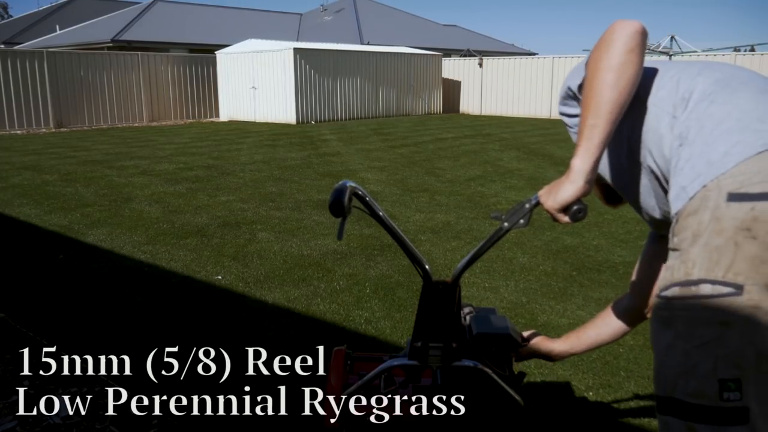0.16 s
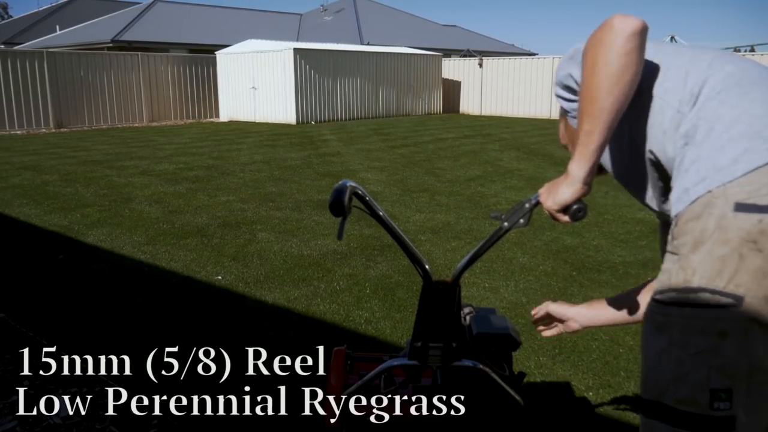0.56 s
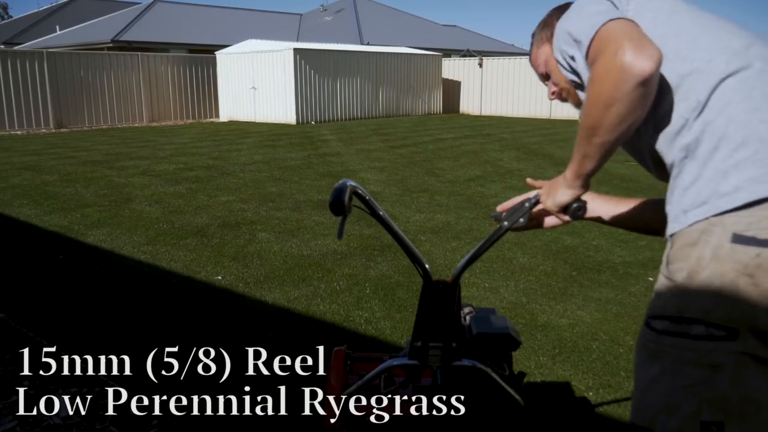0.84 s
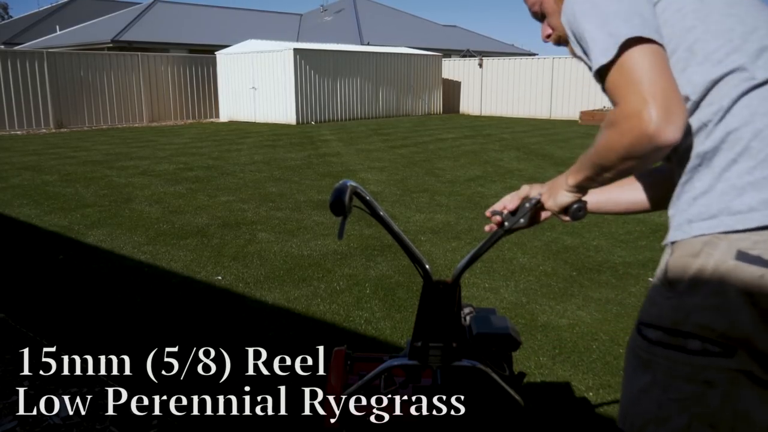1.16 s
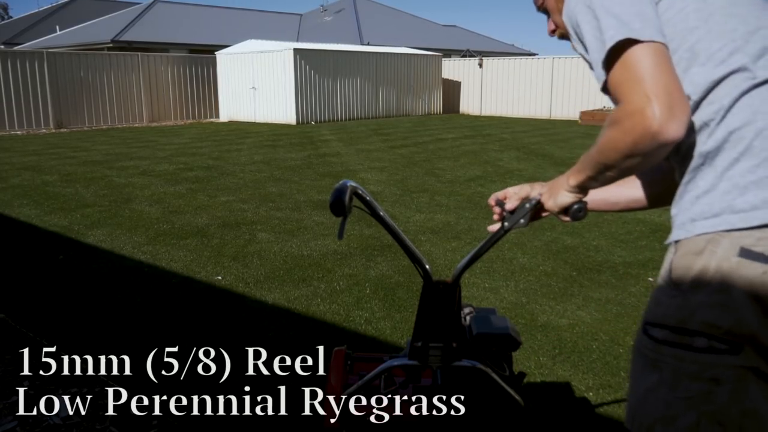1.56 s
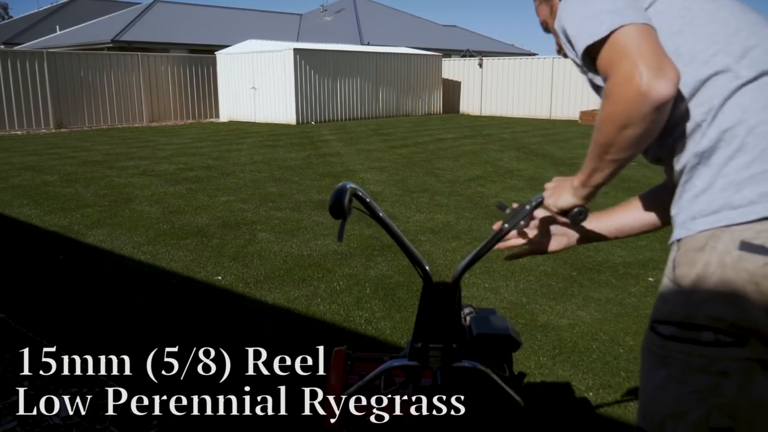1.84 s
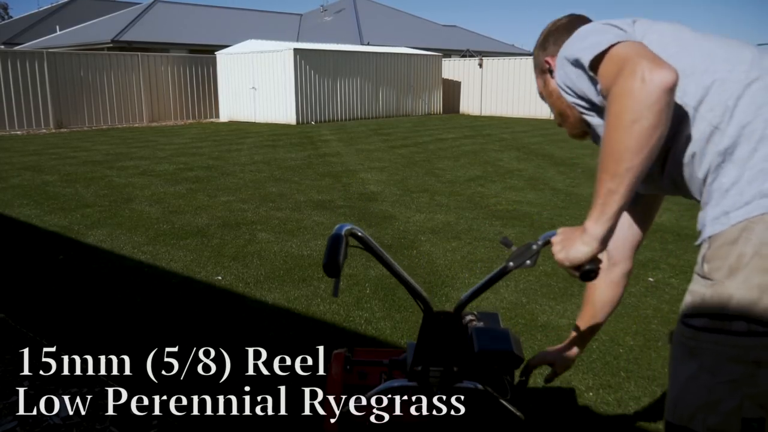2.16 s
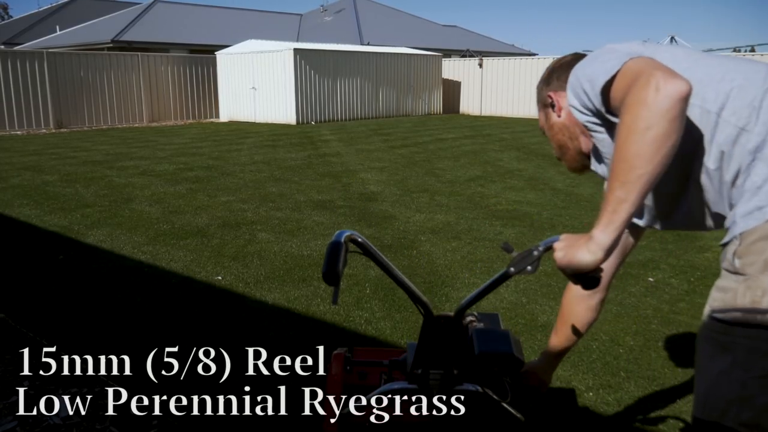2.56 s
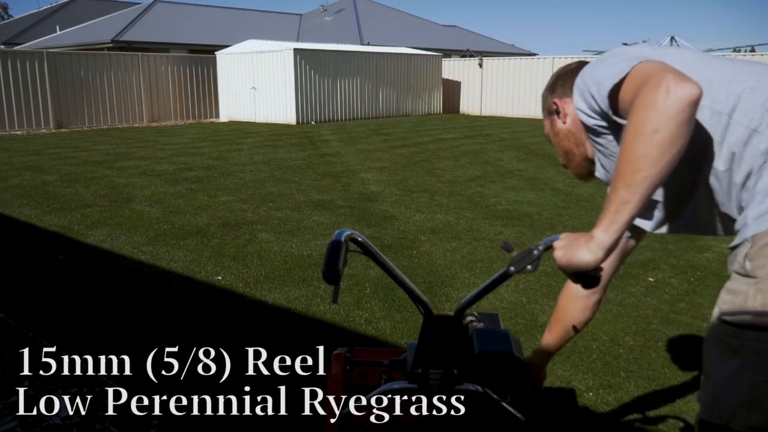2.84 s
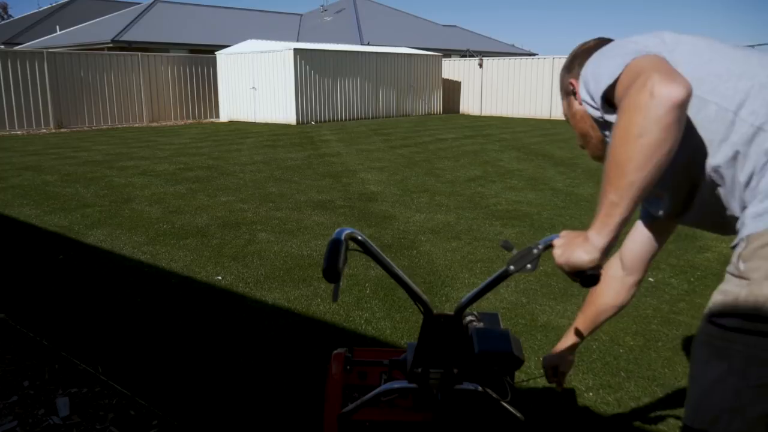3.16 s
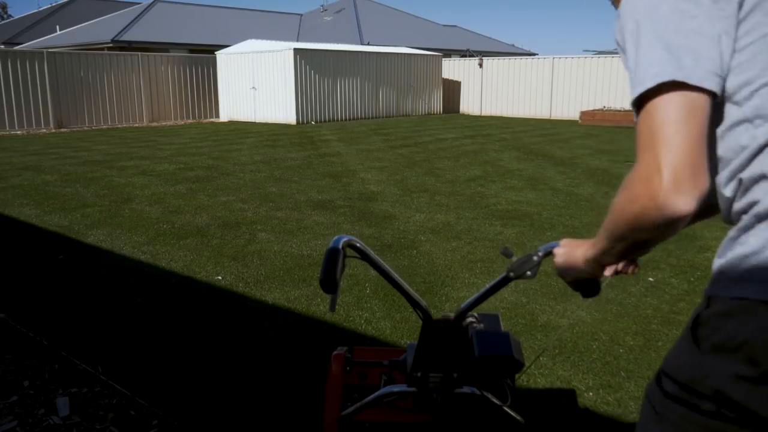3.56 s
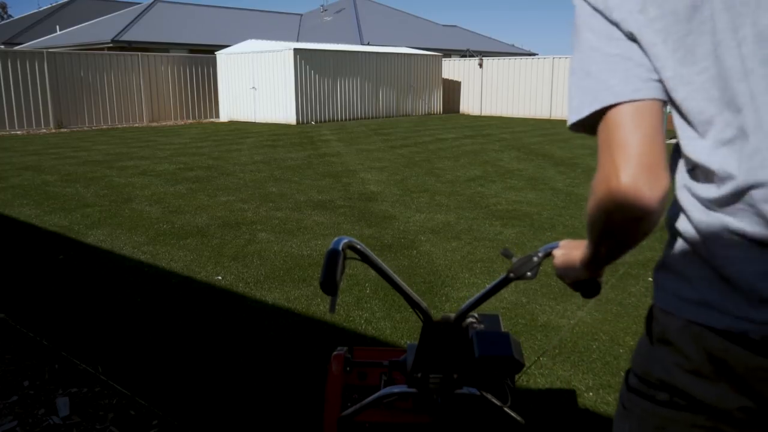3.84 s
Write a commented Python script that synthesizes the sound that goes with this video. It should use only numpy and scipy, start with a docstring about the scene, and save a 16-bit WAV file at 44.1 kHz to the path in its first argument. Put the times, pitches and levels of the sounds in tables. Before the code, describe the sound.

Mower levers click sharply in a windy garden, then the pull starter rattles and clanks

```python
"""Wind buffets the microphone over a quiet garden; levers click, then a mower's starter is pulled.
Wind, hush and hiss are noise shaped in bands; the cable scrape is gritty noise ringing its sheath.
Clicks and knocks are bursts of noise that ring the metal; dense pawl ticks make the starter's rattle.
Squeaks and a whirr are thin wandering bands of noise. The turning engine rumbles and gives four
low puffs, the last one strongest. Fences and a shed send back dull echoes of the mower's metal."""
import sys
import numpy as np
from scipy import signal
from scipy.io import wavfile

SR = 44100
rng = np.random.default_rng(int(sys.argv[2]) if len(sys.argv) > 2 else 0)


def int16_out(signal):
    """Quantize to a 16-bit WAV file."""
    q = np.round(np.clip(np.atleast_2d(signal).T, -1, 1) * 32767)
    wavfile.write(sys.argv[1], SR, q.astype(np.int16))


N = 176400  # length in samples: 4 seconds

# Levels in these tables are in dB, before the small overall trims made in the functions.
# Tone of the suburban hush. Each row: frequency in Hz, relative strength in dB per Hz.
HUSH_TONE = [(150, -5), (553, -17.5), (586, -1), (671, -16), (953, -17), (1410, -20.5), (2120, -27.5),
             (7000, -41.5), (8500, -39), (10500, -43), (13500, -50), (15700, -65)]
# Loudness of the hush. Each row: time in seconds, level in dB.
HUSH_LEVEL = [(0.0, -59), (1.59, -60.5), (2.87, -60.5), (3.5, -59.5)]
# Wind on the microphone. Each row: time in seconds, level in dB.
GUST_LEVEL = [(.03, -27), (.09, -35.5), (.21, -50.5), (.38, -43.5), (.64, -41.5), (.86, -31), (1.04, -33),
              (1.28, -29.5), (1.35, -34.5), (1.59, -27), (1.71, -34), (1.89, -31), (2.03, -34), (2.11, -39),
              (2.29, -30.5), (2.68, -39), (2.81, -46), (3.14, -35), (3.35, -47), (3.52, -54), (3.9, -46)]
# Tone of the wind. Each row: frequency in Hz, relative strength in dB per Hz.
WIND_TONE = [(13, -12), (24, 1), (58, -2), (158, -21), (296, -40), (500, -38.5), (650, -41.5), (1100, -120)]
# Faint scrape. One row: start, peak and end in seconds, level in dB.
RUSTLE = (-1, -2, 0.3, -66)
# Short soft pitched sounds. Each row: start and length in seconds, start and end pitch in Hz, level in dB.
NOTES = [(.177, 0.06, 453, 445, -48.5), (0.614, 0.035, 1100, 1160, -58), (0.649, 0.079, 1183, 1282, -53.5),
         (0.931, 0.038, 3720, 3850, -64), (0.967, 0.021, 3770, 3780, -70)]
# Cable scraping in its sheath. Each row: time in seconds, level near 2 kHz in dB, treble level in dB.
CABLE = [(1.19, -73, -72.5), (1.366, -49.5, -67), (1.49, -57.5, -73), (1.53, -65, -82), (1.57, -59, -82),
         (1.62, -63.5, -95), (1.7, -79, -101)]
# Lever clicks. Each row: time in seconds, ring level in dB, crack level in dB in each of four bands,
# rise in seconds (the swell lasts twice this), crack decay by 60 dB in seconds, favoured pitch in Hz.
CLICKS = [(0.9339, -34, -48, -51, -63.5, -75, 0.0009, 0.075, 1560),
          (1.1397, -60, -69, -48, -48, -55, 0.0014, 0.021, 1780),
          (1.1715, -55, -77, -56, -41, -42, 0.00098, 0.05, 2160),
          (1.1758, -60, -74, -35, -41.5, -41, 0.00055, 0.024, 2200),
          (1.2463, -36, -66, -52.5, -54, -74, 0.0018, 0.078, 2830),
          (1.2965, -43, -60, -48.5, -63, -61, 0.0012, 0.044, 3180),
          (1.314, -19, -58, -53, -51, -65, 0.002, 0.047, 1800),
          (1.322, -10.5, -57, -27, -28, -54, 0.0008, 0.014, 2020),
          (1.3324, -23, -38.5, -31.5, -32, -44, 0.00065, 0.032, 3020),
          (1.4077, -40, -53, -59, -66, -76, 0.00128, 0.04, 1970),
          (1.4501, -39, -46, -45.5, -45.5, -52, 0.00072, 0.03, 2980),
          (1.5401, -40, -62, -41, -45.5, -56, 0.00091, 0.012, 3010),
          (1.5529, -31, -48, -51, -62, -72, 0.0027, 0.13, 1960),
          (1.844, -43, -76, -61, -61, -77, 0.0021, 0.082, 3100)]
# Ringing modes of the levers. Each row: frequency in Hz, relative level in dB, decay by 60 dB in seconds.
LEVER_MODES = [(1171, -3.5, 0.16), (1344, -22, 0.089), (1490, -11.5, 0.22), (1730, -7, 0.084),
               (1930, -3.5, 0.053), (2030, -6, 0.056), (2170, -7, 0.064), (4270, 2, 0.043),
               (3000, -0.5, 0.053), (4800, 4, 0.049), (5800, -6, .06)]
# The four crack bands of the levers. Each row: low and high edge in Hz.
LEVER_BANDS = [(900, 1600), (1600, 3300), (3300, 9000), (9000, 15800)]
# Thin squeaks of the recoil spring, two lists. Each row: time in seconds, pitch in Hz, level in dB.
SQUEAKS = [
    [(2.92, 8300, -90), (3.09, 8200, -75), (3.16, 8400, -65), (3.21, 8300, -80), (3.31, 8450, -70),
     (3.35, 8600, -71), (3.4, 8400, -88), (3.51, 8300, -71), (3.6, 8400, -66)],
    [(3.345, 6800, -70), (3.4, 6720, -76), (3.46, 6820, -76), (3.52, 7100, -69), (3.55, 6800, -73)],
]
# Width in Hz of each squeak's wavering.
SQUEAK_WIDTHS_HZ = (260, 70)
# Wandering whirr of the starter pulley. Each row: time in seconds, pitch in Hz, level in dB.
WHIRR = [(3.55, 1420, -41.5), (3.6, 1380, -50), (3.655, 1300, -40), (3.685, 1450, -33.5),
         (3.725, 1300, -40), (3.75, 1370, -25.5), (3.772, 1320, -42), (3.795, 1330, -26),
         (3.812, 1400, -39), (3.84, 1500, -30), (3.89, 1330, -37), (3.967, 1420, -23), (4.0, 1450, -45)]
# Cord running out. Each row: time in seconds, rattle level in dB, hiss level in dB.
PULL = [(2.85, -67.5, -86), (2.97, -67, -69), (3.12, -52, -65), (3.27, -48.5, -64), (3.42, -70, -65.5),
        (3.5, -63, -58.5), (3.56, -37, -53), (3.6, -41.5, -52), (3.65, -34, -43), (3.736, -34, -39.5),
        (3.794, -24, -40.5), (3.88, -46, -38.5), (4.0, -36, -36)]
# Tone of the cord and fan hiss. Each row: frequency in Hz, relative strength in dB per Hz.
HISS_TONE = [(120, -39), (200, -15), (365, -9.5), (632, -1), (997, -4.5), (1310, -4.5), (2190, -18),
             (2530, -12.5), (6310, -20), (15700, -34)]
# Knocks and clanks on the starter housing. Each row has the same columns as the lever clicks.
KNOCKS = [(2.458, -44, -47, -59, -67, -87, 0.002, 0.076, 1490),
          (2.541, -41.5, -59, -53.5, -78, -82, 0.0047, 0.045, 840),
          (2.762, -44, -71, -70, -77, -80, 0.0031, 0.035, 611),
          (3.146, -41, -58, -45, -64, -71, 0.0021, 0.053, 1490),
          (3.156, -26.5, -37.5, -46, -45, -46, 0.00384, 0.1, 890),
          (3.251, -36, -53, -54, -64, -77, 0.0042, 0.056, 890),
          (3.299, -32, -44.5, -41, -51, -58, 0.0041, 0.088, 1490),
          (3.344, -42, -34.5, -48, -47, -74, 0.0035, 0.06, 1360),
          (3.351, -30, -40.5, -51, -72, -73, 0.0031, 0.26, 1140),
          (3.509, -55, -47, -48, -50.5, -57, 0.0034, 0.24, 641),
          (3.555, -33, -38, -48, -58, -64, 0.0063, 0.19, 1490),
          (3.614, -13.5, -27.5, -25, -32, -39, 0.0044, 0.024, 537),
          (3.665, -16.5, -51, -23, -29.5, -42, 0.0046, 0.06, 1230),
          (3.684, -19, -36, -27, -39, -49, 0.004, 0.14, 1440),
          (3.714, -26, -24.5, -47, -32, -43, 0.0042, 0.057, 1280),
          (3.741, -15.5, -40, -39, -37.5, -40, 0.005, 0.042, 1360),
          (3.748, -34, -48, -26.5, -26, -43, 0.0022, 0.042, 1390),
          (3.782, -29, -27, -32, -53, -55, 0.004, 0.064, 1290),
          (3.793, -23, -35, -48, -35, -45, 0.0045, 0.054, 1300),
          (3.821, -17.5, -57, -26.5, -26.5, -55, 0.0026, 0.025, 1430),
          (3.837, -22, -47, -24.5, -30, -60, 0.0025, 0.074, 1440),
          (3.909, -37, -21, -29, -33, -58, 0.0018, 0.087, 410),
          (3.933, -6.5, -18.5, -16, -12, -21, 0.004, 0.033, 2450),
          (3.951, -23, -40, -39, -27, -38, 0.005, 0.031, 1320),
          (3.963, -15, -45, -29, -29.5, -62, 0.0033, 0.1, 1420)]
# Ringing modes of the housing. Each row: frequency in Hz, relative level in dB,
# decay by 60 dB in seconds (shortened for the pawl rattle).
HOUSING_MODES = [(488, -0.5, 0.12), (580, -20, 0.067), (618, 2.5, 0.05), (770, 0.5, 0.11), (910, -1, 0.076),
                 (1142, 1, 0.079), (1320, -2, 0.12), (1420, 4.5, 0.061), (1490, 1, 0.087),
                 (1760, -8, 0.076), (1940, -12, 0.04), (2390, 5, 0.03)]
# The four crack bands of the housing. Each row: low and high edge in Hz.
HOUSING_BANDS = [(250, 1000), (1000, 2800), (2800, 8800), (8800, 15800)]
# Decay time of each of the four crack bands, as a share of the hit's own decay time.
CRACK_SPAN = (1.24, 1.17, 1.2, 0.7)
# Rumble of the turning engine. Each row: time in seconds, level in dB.
CHUG = [(3.5, -68), (3.732, -36.5), (4.0, -33)]
# Piston puffs. Each row: time in seconds, height in dB, pitch in Hz, decay by 60 dB in seconds.
THUMPS = [(3.624, -26, 61.9, 0.027), (3.751, -20, 152, 0.028), (3.802, -28.5, 119, 0.047),
          (3.933, -14, 103, 0.065)]
# Echoes from fences and shed. Each row: delay in seconds, level in dB.
ECHOES = [(.012, -15.5), (.031, -16), (.058, -28)]

FLUTTER_GROWTH = 1  # extra dB of flutter per dB of wind
NOTE_WIDTH_HZ, WHIRR_WIDTH_HZ = 32, 61  # how fast these sounds waver
LEVER_RING_DB, HOUSING_RING_DB, CRACK_DB = -15, -12.5, -5
LEVER_DETUNE, HOUSING_DETUNE = 0.012, 0.014  # typical pitch error of a mode, as a share of its pitch
OFF_PITCH_DB = 14  # modes lose this per octave from the pitch a hit favours
PAWL_PER_S, PAWL_SPREAD_DB = 760, 3.5  # tick rate before lumping; spread of tick sizes
MIC_DIP_HZ, MIC_DIP_WIDTH_HZ, MIC_DIP_SHARE = 10580, 1660, 0.48
CUTOFF_HZ = 15900  # sound above this is at least 70 dB down


def amp(db):
    """Turn decibels into a gain."""
    return 10 ** (np.asarray(db) / 20)


def unit(x):
    """Scale a sound to an average (rms) level of 1."""
    return x / np.sqrt(np.mean(x ** 2) + 1e-20)


def curves(rows):
    """Draw straight lines between a table's times, one signal for each other column."""
    times, *columns = np.transpose(rows)
    return [np.interp(np.arange(N) / SR, times, column) for column in columns]


def gate(rows, fade_s):
    """Fade in from a table's first time and fade out after its last."""
    t = np.arange(N) / SR
    opening = t - rows[0][0]
    closing = rows[-1][0] + fade_s - t
    return np.clip(np.minimum(opening, closing) / fade_s, 0, 1)


def band(x, low, high):
    """Keep the frequencies between low and high."""
    return signal.sosfilt(signal.butter(2, [low, high], "band", fs=SR, output="sos"), x)


def drift(rate):
    """Random wandering around 0 with a spread of 1; a higher rate (in Hz) wanders faster."""
    step = 40  # drawn at every 40th sample, then joined by straight lines
    r = np.exp(-2 * np.pi * rate * step / SR)
    white = rng.standard_normal(N // step + 2002)
    slow = signal.lfilter([1], [1, -2 * r, r * r], white)[2000:]  # skip the filter's start
    return np.interp(np.arange(N) / step, np.arange(len(slow)), unit(slow))


def coloured(tone, patchy_db, rate):
    """Noise in half-octave bands that flicker partly together and partly alone; rms 1."""
    hz, db = np.transpose(tone)
    edges = np.geomspace(hz[0], hz[-1], int(2 * np.log2(hz[-1] / hz[0])) + 2)
    white = rng.standard_normal((2, N))  # neighbouring bands use different noise
    shared = drift(rate)
    out = np.zeros(N)
    for k, (low, high) in enumerate(zip(edges, edges[1:])):
        level_db = np.interp(np.log(low * high) / 2, np.log(hz), db)
        flicker_db = patchy_db * (0.91 * shared + drift(rate))
        out += amp(level_db + flicker_db) * band(white[k % 2], low, high)
    return unit(out)


def noise_line(rows, width):
    """A narrow wavering band of noise that follows a pitch and level curve."""
    hz, db = curves(rows)
    turn = 2 * np.pi * np.cumsum(hz) / SR
    flicker_db = 2.5 * drift(30)
    wavering = drift(width) * np.cos(turn) + drift(width) * np.sin(turn)
    return gate(rows, 0.013) * amp(db + flicker_db) * wavering


def ring(x, hz, t60):
    """A resonance: a unit click sets off a sine of height about 1, falling 60 dB in t60 seconds."""
    r = amp(-60 / (t60 * SR))
    w = 2 * np.pi * hz / SR
    return signal.lfilter([0, np.sin(w)], [1, -2 * r * np.cos(w), r * r], x)


def struck(events, bands, modes, ring_db, detune):
    """Each hit is a swelling and dying crack of noise; near its peak it rings the body's modes."""
    size = SR // 5  # each hit is cut off after a fifth of a second
    cracks, rings = np.zeros(N + size), np.zeros(N + size)
    noises = []
    for low, high in bands:
        white = rng.standard_normal(N + size)
        noises.append(unit(band(band(white, low, high), low, high)))
    t = np.arange(size) / SR
    mode_hz, mode_db, mode_t60 = np.transpose(modes)[:, :, None]
    for s, db, *levels, rise, t60, favoured_hz in events:
        swell_s = 2 * rise
        start = int((s - rise) * SR)
        span = slice(start, start + size)
        swell = np.minimum(t / swell_s, 1) ** 2
        fall_db = -60 * np.maximum(t - swell_s, 0) / t60
        for level, noise, share in zip(levels, noises, CRACK_SPAN):
            cracks[span] += swell * amp(level + CRACK_DB + fall_db / share) * noise[span]
        # every mode gets its own chance of level, pitch and start in every hit
        mix, off, late = rng.standard_normal((3, len(modes), 1))
        since = np.maximum(t - swell_s * (1 + 0.22 * late), 0)
        off_pitch_db = OFF_PITCH_DB * abs(np.log2(mode_hz / favoured_hz))
        level_db = db + ring_db + mode_db + 1.03 * mix - off_pitch_db - 60 * since / mode_t60
        sines = np.sin(2 * np.pi * mode_hz * (1 + detune * off) * since)
        rings[span] += np.sum(amp(level_db) * sines, axis=0)
    return (cracks + band(rings, bands[0][0], bands[-1][1]))[:N]


def hush():
    """Quiet suburban background: patchy noise with a fixed tone and a slow level curve."""
    return amp(curves(HUSH_LEVEL)[0] + 1) * coloured(HUSH_TONE, patchy_db=1.73, rate=17.5)


def wind():
    """Gusts press on the microphone as deep noise; strong gusts add a higher flutter."""
    gust_db = curves(GUST_LEVEL)[0]
    buffet = amp(gust_db - 2.6) * coloured(WIND_TONE, patchy_db=0.96, rate=9.3)
    flutter_db = gust_db - 21.5 + FLUTTER_GROWTH * (gust_db + 28.5)
    flutter = amp(flutter_db) * unit(band(rng.standard_normal(N), 109, 232))
    return buffet + flutter


def rustle():
    """A faint scrape: mid-treble noise that is already fading softly as the sound begins, gone by 0.3 s."""
    *times, db = RUSTLE
    swell = np.interp(np.arange(N) / SR, times, [0, 1, 0])
    return amp(db) * swell * unit(band(rng.standard_normal(N), 2850, 4500))


def notes():
    """Short breathy glides in pitch, with a quick rise and a slower fall."""
    out = np.zeros(N)
    waver, breath = drift(NOTE_WIDTH_HZ), drift(NOTE_WIDTH_HZ)
    for s, length, start_hz, end_hz, db in NOTES:
        u = np.linspace(0, 1, int(length * SR))
        turn = 2 * np.pi * np.cumsum(start_hz + (end_hz - start_hz) * u) / SR
        span = slice(int(s * SR), int(s * SR) + len(u))
        tone = (1 + 0.5 * waver[span]) * np.sin(turn) + 0.5 * breath[span] * np.cos(turn)
        out[span] += amp(db) * np.sin(np.pi * u ** 0.45) * tone
    return out


def cable():
    """Grainy friction: slips ring the sheath near 2 kHz, with a thin treble."""
    low_db, high_db = curves(CABLE)
    grit = rng.standard_normal(N) * amp(3.5 * drift(50))
    sheath = ring(grit, 1980, 0.017) + 0.39 * ring(grit, 2285, 0.019)
    treble = unit(band(grit, 3400, 6800)) + 0.24 * unit(ring(grit, 5940, 0.02))
    return gate(CABLE, 0.025) * (amp(low_db - 3) * unit(sheath) + amp(high_db + 3) * treble)


def lever_clicks():
    """Levers on the handle snap and ring their metal."""
    return struck(CLICKS, LEVER_BANDS, LEVER_MODES, LEVER_RING_DB, LEVER_DETUNE)


def squeaks():
    """The recoil spring squeaks in two thin wavering bands of noise."""
    return sum(noise_line(rows, width) for rows, width in zip(SQUEAKS, SQUEAK_WIDTHS_HZ))


def whirr():
    """The starter pulley whirrs as one narrow band of noise that wanders in pitch."""
    return amp(-4.5) * noise_line(WHIRR, WHIRR_WIDTH_HZ)


def starter():
    """Dense pawl ticks in lumps ring the housing; the cord and fan hiss."""
    rattle_db, hiss_db = curves(PULL)
    lumps = drift(30)
    sizes = amp(PAWL_SPREAD_DB * np.minimum(rng.exponential(1, N), 4))
    sizes = sizes * rng.choice([-1, 1], N)
    ticks = (rng.random(N) < PAWL_PER_S * amp(4 * lumps) / SR) * sizes
    group = rng.integers(0, 3, N)  # each tick rings only every third mode
    rattle = np.zeros(N)
    for k, (hz, db, t60) in enumerate(HOUSING_MODES):
        rattle += amp(db) * ring(ticks * (group == k % 3), hz, 0.37 * t60)
    hiss = coloured(HISS_TONE, patchy_db=0.5, rate=25) * amp(2 * lumps)
    hiss = hiss / np.std(band(hiss, 3000, 10000))  # its level counts from 3 to 10 kHz
    return gate(PULL, 0.1) * (amp(rattle_db - 10.5) * unit(rattle) + amp(hiss_db - 4.5) * hiss)


def housing_knocks():
    """Knocks and clanks ring the starter housing."""
    return struck(KNOCKS, HOUSING_BANDS, HOUSING_MODES, HOUSING_RING_DB, HOUSING_DETUNE)


def piston():
    """The turning engine: low ringing puffs at compressions over a rough rumble."""
    rumble_db = curves(CHUG)[0] - 11.5 + 6.4 * drift(27)
    out = gate(CHUG, 0.1) * amp(rumble_db) * unit(band(rng.standard_normal(N), 61, 280))
    for s, db, hz, t60 in THUMPS:
        kick = np.zeros(N)
        kick[int(s * SR)] = amp(db)
        out += ring(kick, hz, t60)
    return out


def yard(x):
    """Add a few dull echoes from fences and shed."""
    dull, out = band(x, 230, 4100), x.copy()
    for s, db in ECHOES:
        lag = int(s * SR)
        out[lag:] += amp(db) * dull[:-lag]
    return out


def scene():
    """Mix the background with the mower; only the mower's metal, cable and cord sounds echo."""
    background = hush() + wind() + rustle() + notes()
    mower = cable() + lever_clicks() + squeaks() + whirr() + starter() + housing_knocks()
    return (background + yard(mower) + piston())[None]


def record(dry):
    """The microphone is weaker in a dip near 10.6 kHz, and the very top is cut."""
    peak = signal.lfilter(*signal.iirpeak(MIC_DIP_HZ, MIC_DIP_HZ / MIC_DIP_WIDTH_HZ, fs=SR), dry)
    top_cut = signal.cheby2(16, 70, CUTOFF_HZ, fs=SR, output="sos")
    return signal.sosfilt(top_cut, dry - MIC_DIP_SHARE * peak)


dry = scene()
out = record(dry)
int16_out(out)
```